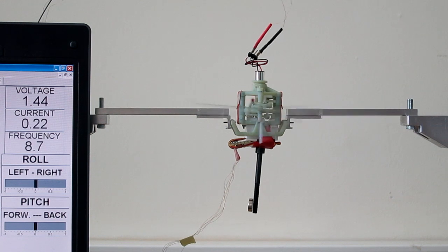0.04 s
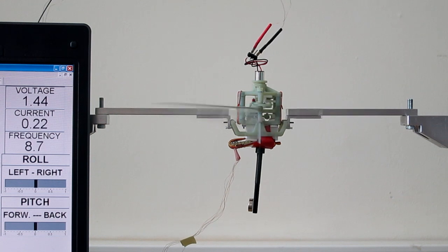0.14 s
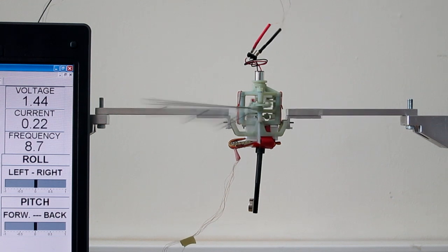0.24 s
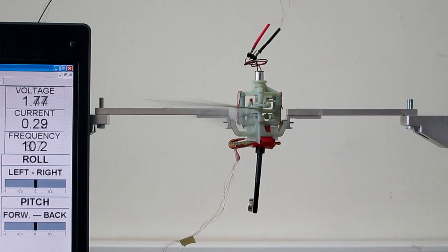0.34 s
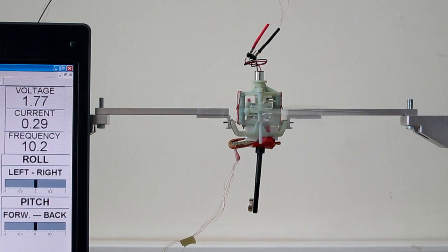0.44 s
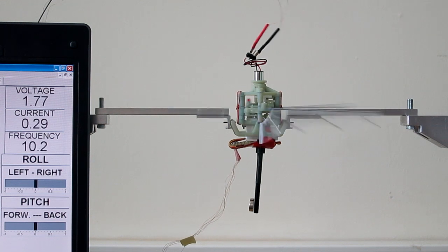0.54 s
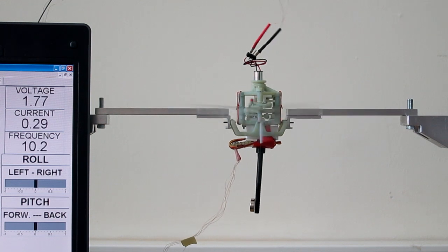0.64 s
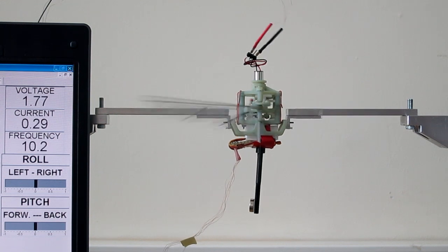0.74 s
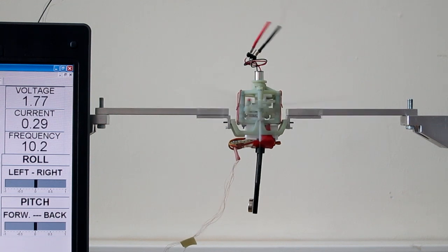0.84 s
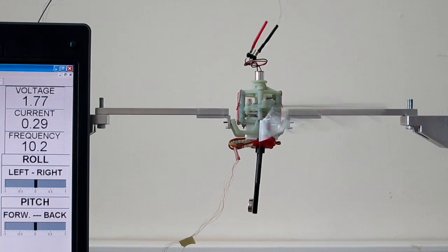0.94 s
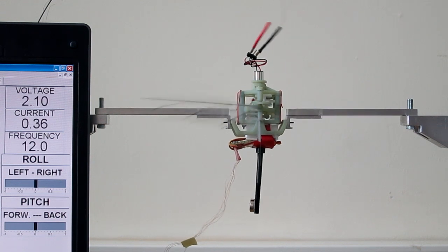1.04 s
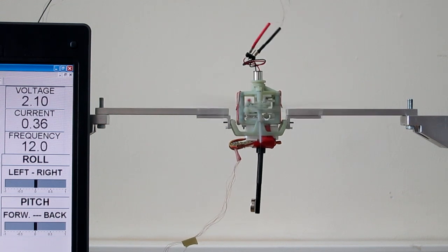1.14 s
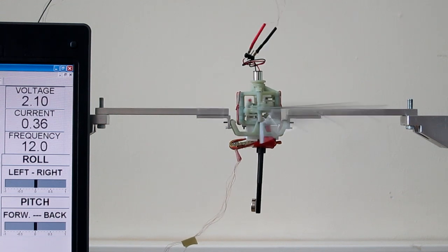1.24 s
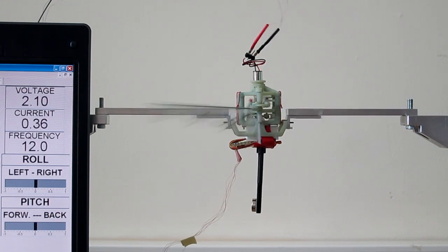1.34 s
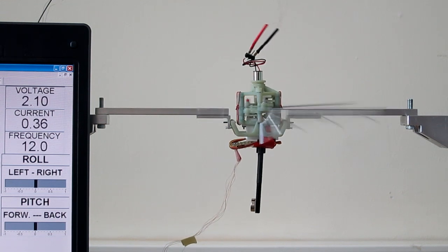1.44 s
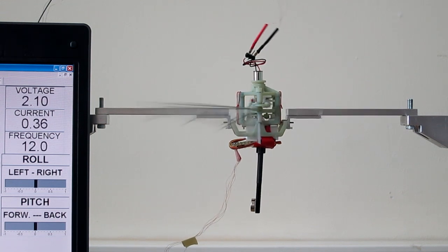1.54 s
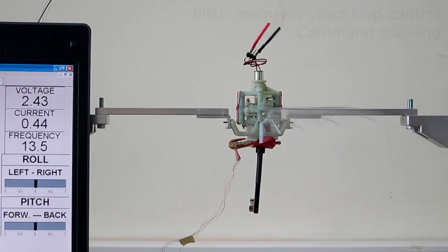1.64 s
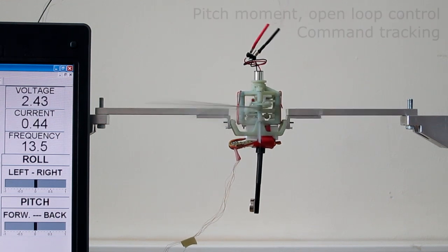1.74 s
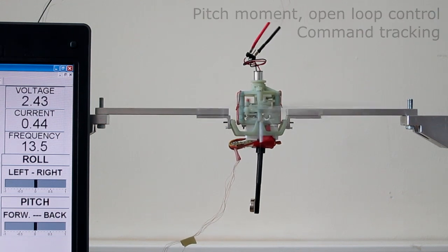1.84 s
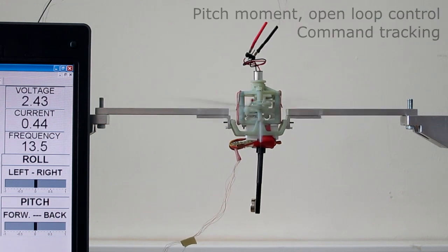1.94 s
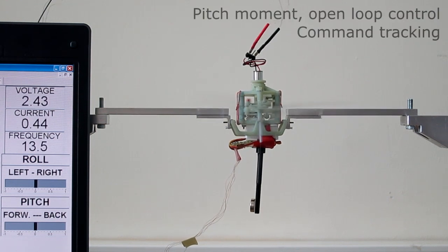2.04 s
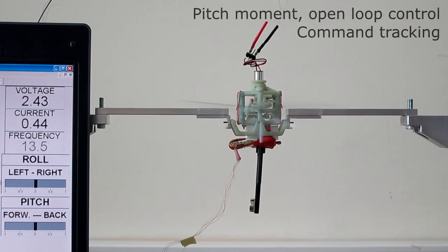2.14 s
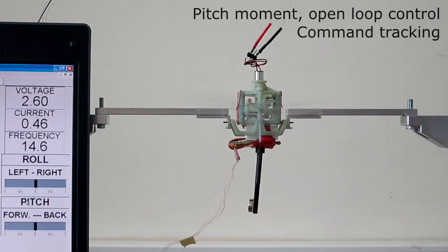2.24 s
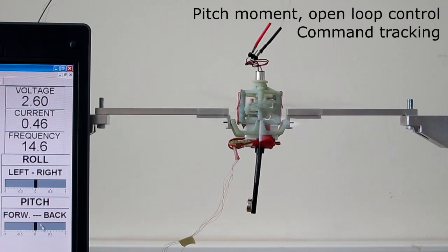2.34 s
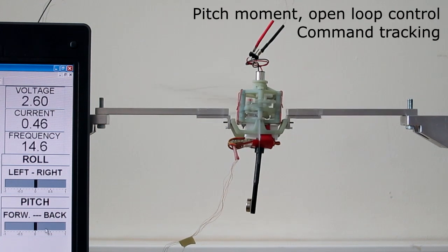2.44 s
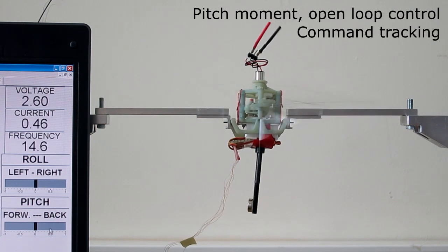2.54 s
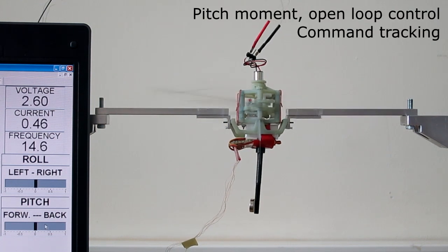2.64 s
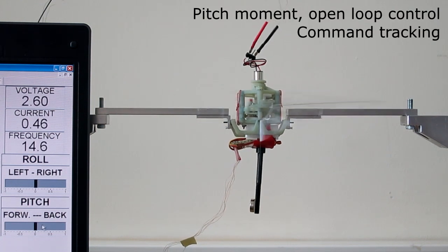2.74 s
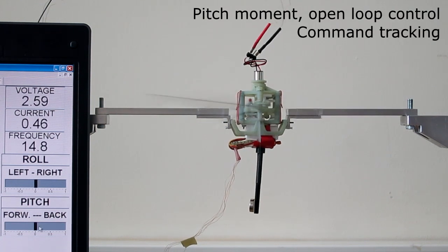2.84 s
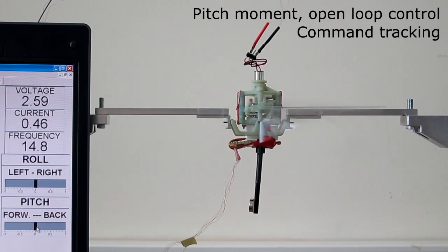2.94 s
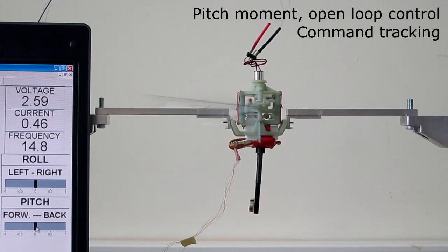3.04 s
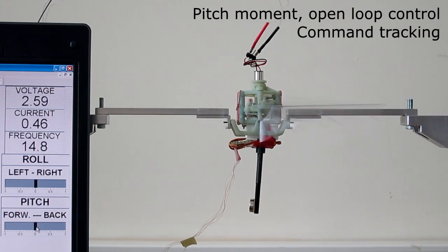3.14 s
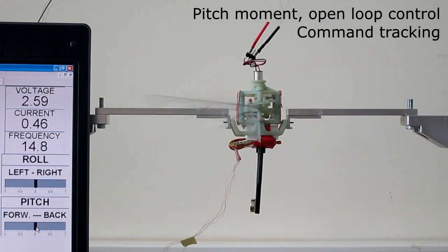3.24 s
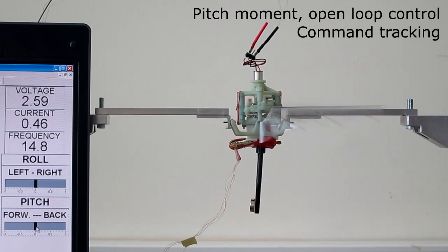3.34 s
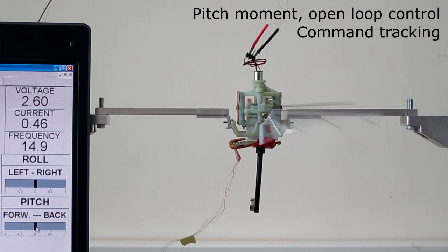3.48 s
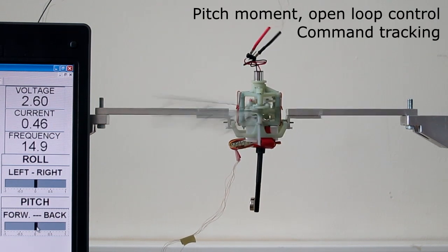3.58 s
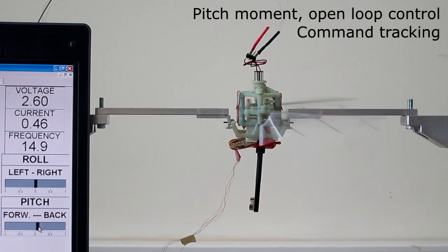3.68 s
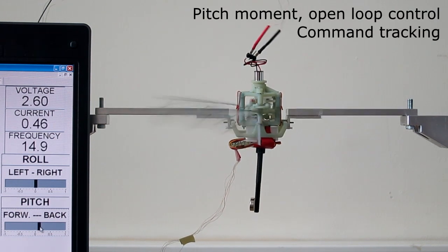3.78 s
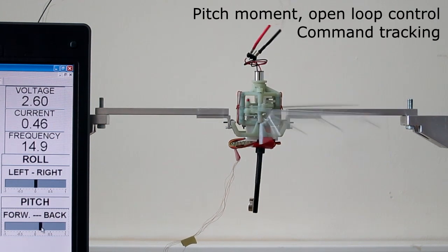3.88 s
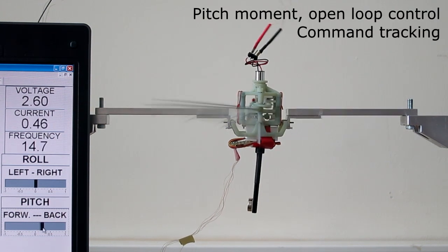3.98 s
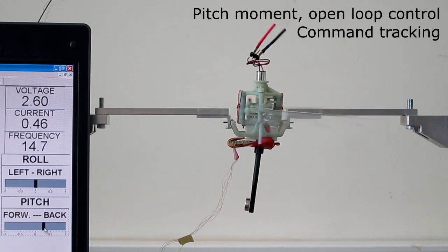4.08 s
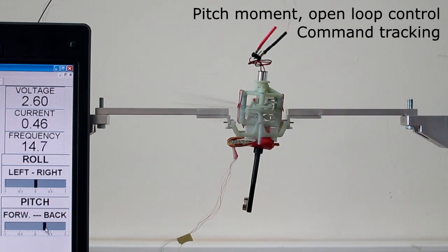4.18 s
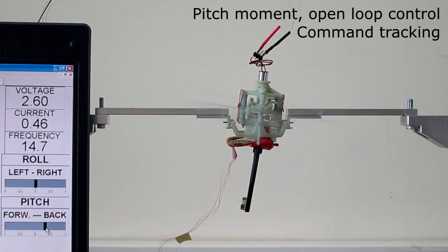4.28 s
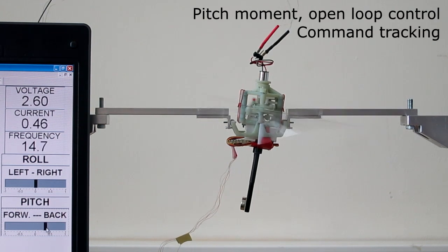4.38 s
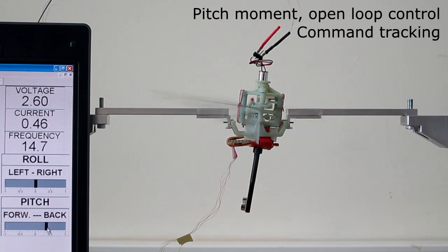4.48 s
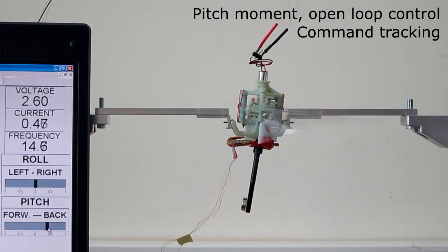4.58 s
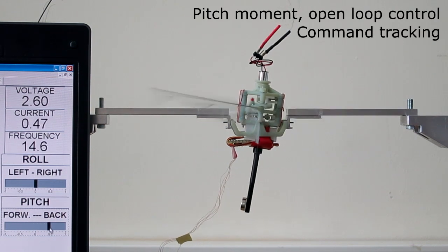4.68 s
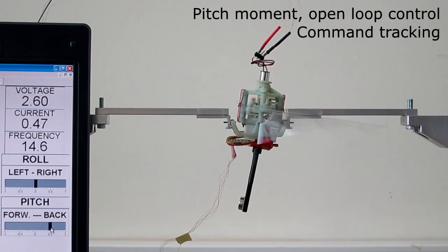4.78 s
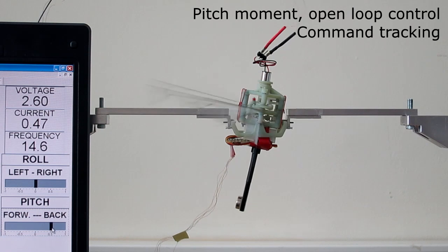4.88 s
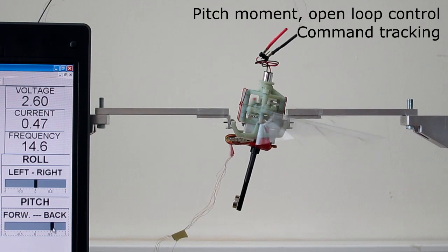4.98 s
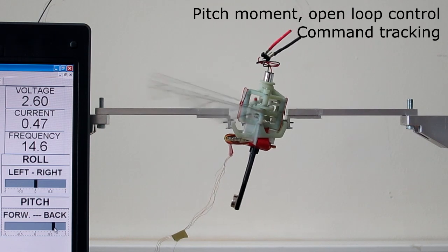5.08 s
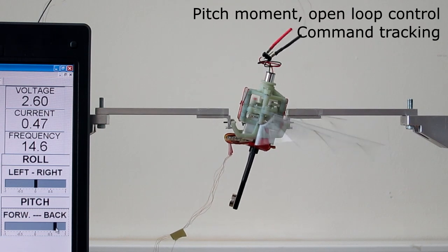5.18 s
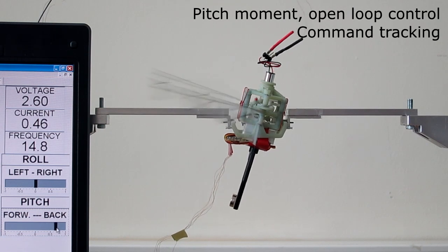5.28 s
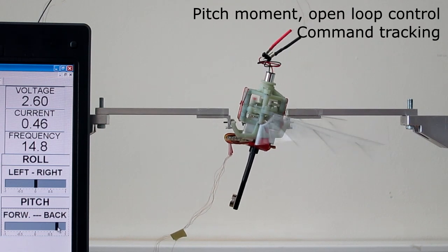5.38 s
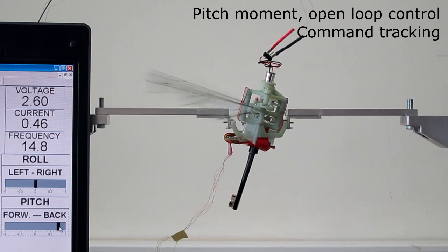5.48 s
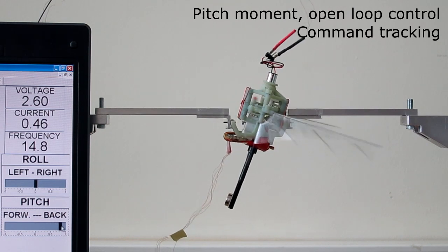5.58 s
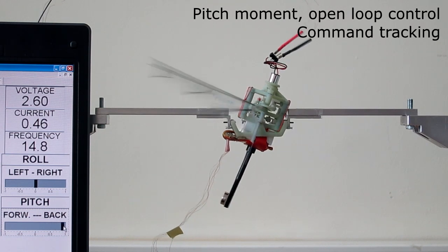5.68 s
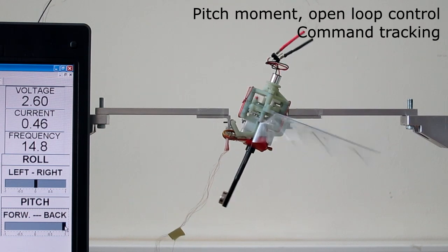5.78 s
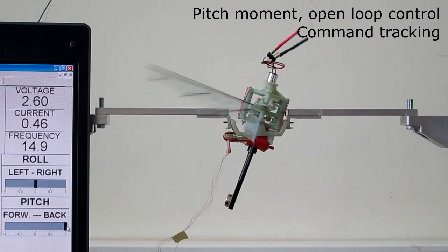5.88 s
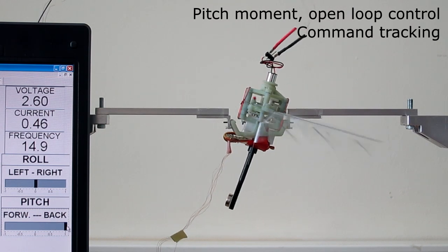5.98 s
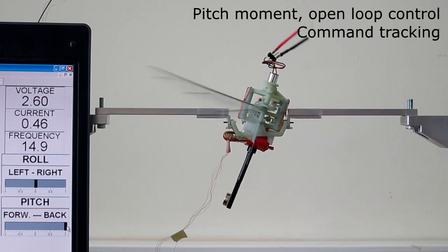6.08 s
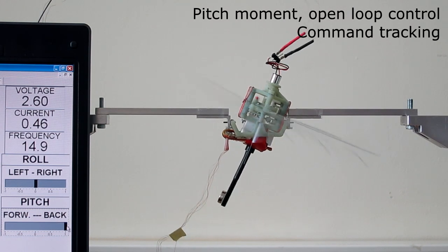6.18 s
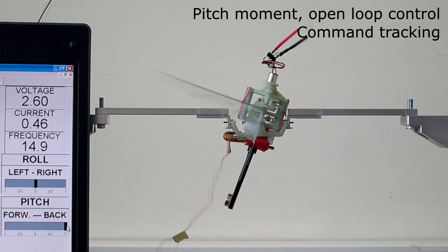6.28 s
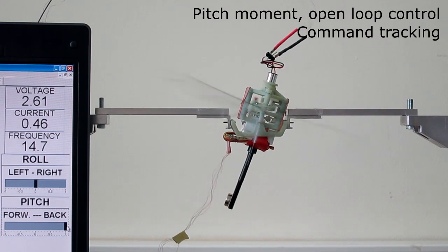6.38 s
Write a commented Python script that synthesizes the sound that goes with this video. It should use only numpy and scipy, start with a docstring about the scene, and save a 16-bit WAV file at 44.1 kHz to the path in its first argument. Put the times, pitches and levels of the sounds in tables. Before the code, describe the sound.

A stereo close microphone hears a tiny winged machine clattering on a test stand. Its paired snaps of thin film start as a quick rattle and tighten into a rough, fluttering buzz within three seconds. Low air pulses, hollow knocks and a throbbing hum lie beneath, with bright gear hiss between beats. The pace then stays nearly steady, wavering slightly, in a lightly reflective room with faint air noise.

```python
"""A lab, close up: a small flapping-wing robot speeds up on a test stand and settles near fifteen beats a second.
Twice in every wingbeat the film wings flip over: filtered pulses push the air, thump the membrane, knock
the frame and ring the stand, while bursts of tiny clicks make the crackling snap of the film.
Gears and sliding film hiss throughout, and the sweeping wings hum on multiples of the beat.
Sparse room reflections throw the ticks back over a low wash of air."""
import sys
import numpy as np
from scipy import signal
from scipy.fft import rfft, irfft
from scipy.io import wavfile
from scipy.ndimage import uniform_filter1d

SR = 44100
rng = np.random.default_rng(int(sys.argv[2]) if len(sys.argv) > 2 else 0)


def generate_wav(sig):
    """Save sig (samples, or channels by samples) to the path in sys.argv[1] as 16-bit PCM at SR."""
    pcm = np.round(np.clip(np.atleast_2d(sig).T, -1, 1) * 32767).astype(np.int16)
    wavfile.write(sys.argv[1], SR, pcm)


N = 283122
TIME = np.arange(N) / SR

# the motor is stepped up to cruising speed, then sags a little under load: start_s, wingbeats_per_s
WING_SPEED = [(0.0, 10.4), (0.54, 12.179), (0.84, 12.625), (1.52, 14.579), (2.62, 14.915), (2.72, 14.784),
              (3.04, 14.936), (3.72, 14.615), (4.3, 14.45), (4.4, 14.75), (4.88, 14.914), (5.82, 14.81),
              (5.96, 14.478), (6.42, 14.79)]
# how hard the wings work: start_s, effort_db, relative membrane thump_db
WING_LOAD = [(0.0, -5.5, -53), (0.36, -4.5, -51), (0.5, -7, -55.5), (1.02, -5, -57.5), (1.42, -2.5, -48.5),
             (1.8, -1.55, -47.5), (2.22, 1, -46.5), (2.38, -1.3, -51.5), (2.74, 0.3, -49), (3.14, 0.1, -49),
             (3.64, -1.5, -47), (4.0, -0.5, -45), (4.4, -1.5, -46), (5.1, -0.14, -46.5), (5.55, 1.6, -44),
             (5.76, 0.2, -43.5), (5.86, -1.8, -50.5), (6.42, -0.4, -46.5)]


def amp(db):
    """Decibels to gain."""
    return 10 ** (np.asarray(db) / 20)


def evened(x):
    """Scales to an rms of one."""
    return x / np.sqrt(np.mean(x ** 2) + 1e-20)


def curve(rows, t=TIME, column=1):
    """One column of a control curve at the times t, joined by straight lines."""
    rows = np.asarray(rows)
    return np.interp(t, rows[:, 0], rows[:, column])


def read(points, hz):
    """A spectrum at the frequencies hz, joined on a log axis."""
    point_hz, value = np.transpose(points)
    return np.interp(np.log(hz + 1), np.log(point_hz), value)


def through(x, response):
    """Convolves and keeps the length of the scene."""
    return signal.oaconvolve(x, response)[:N]


def colour(x, spectrum, size=4096):
    """Minimum-phase filter with the given spectrum: sharp attack, ringing afterwards."""
    hz = abs(np.fft.fftfreq(size, 1 / SR))
    log_gain = np.log(amp(read(spectrum, hz)))
    # the Hilbert transform of the log gain gives the phase
    response = np.fft.ifft(np.exp(np.conj(signal.hilbert(log_gain)))).real
    return through(x, response[:size // 2])


def shaped(x, spectrum):
    """Colours a sound and keeps its power."""
    return evened(colour(x, spectrum)) * x.std()


def swelled(x, spectrum):
    """Zero-phase filter: each push becomes a pressure pulse that builds as smoothly as it fades."""
    gain = amp(read(spectrum, np.fft.rfftfreq(2 * N, 1 / SR)))
    return irfft(rfft(x, 2 * N) * gain)[:N]


def ringing(modes):
    """The sum of dying tones after one blow."""
    t = np.arange(SR // 4) / SR
    return sum(amp(db - 60 * t / t60) * np.cos(2 * np.pi * hz * t) for hz, db, t60 in modes)


def add(mix, start_s, sound):
    """Mixes a sound in at start_s."""
    part = mix[max(round(start_s * SR), 0):][:len(sound)]
    part += sound[:len(part)]


def driven(law, t=TIME):
    """Level in dB of a part that grows with the effort of the wings."""
    full_db, growth = law
    return full_db + growth * curve(WING_LOAD, t)


def crank():
    """Turns of the crank so far, one for each wingbeat: the running sum of the speed."""
    start_turn = .1887
    return start_turn + np.cumsum(curve(WING_SPEED)) / SR


def flips():
    """Times of the taut and the slack wing flips, one of each in a turn of the crank."""
    slack_share = .478  # the slack flip comes just before half a wingbeat after the taut one
    turns = crank()
    beats = np.arange(int(turns[-1]))
    taut = np.interp(beats + 1, turns, TIME)
    slack = np.interp(beats + slack_share, turns, TIME)
    return taut, slack


def air(floor_db=-56):
    """Low wash of ventilation and stirred air: coloured noise, partly unlike at the two ports."""
    # hz, relative level_db
    floor_spectrum = [(20, 3), (45, 5), (70, -11), (130, -2), (350, 1), (700, -13), (2000, -10),
                      (8000, -73), (16000, -34)]
    left, right, shared = (evened(colour(rng.standard_normal(N), floor_spectrum)) for _ in range(3))
    return amp(floor_db) * evened(np.array([left, right]) + 0.26 * shared)


def wing_hum(hum_db=-9, port_spread=1.27, waver_db=3.5, speed_power=4.7):
    """The sweeping wings hum on multiples of the beat, louder with speed; each tone wavers."""
    # multiple of the wingbeat, relative level_db
    wing_tones = [(4, -8), (5, -13), (6, -7), (7, -1), (8, -10), (9, 1), (10, -1), (11, -4), (12, -5),
                  (13, -3), (14, -7)]
    out = np.zeros((2, N))
    angle = 2 * np.pi * crank()
    for multiple, db in wing_tones:
        # the high tones peak later in the stroke, so the hum throbs gently
        lag = np.pi * multiple ** 2 / 16
        # each tone meets the two ports out of step (radians)
        apart = port_spread * rng.choice([-1, 1]) * np.array([[.5], [-.5]])
        drift = rng.standard_normal(size=14)
        waver = np.interp(TIME, np.linspace(0, TIME[-1], len(drift)), drift)
        out += amp(db + waver_db * waver) * np.cos(multiple * angle - lag + apart)
    level_db = curve(WING_LOAD, column=2) + hum_db
    return amp(level_db) * evened(out * curve(WING_SPEED) ** speed_power)


def gears(grain_db=2.5, flutter_db=2.0):
    """Teeth and sliding film hiss: noise of uneven grains with a fast, irregular flutter."""
    # hz, relative level_db
    hiss_spectrum = [(100, -10), (400, -2), (700, -3), (1150, 1.5), (2000, -3.5), (3600, -4.5),
                     (4700, -1.5), (7000, 2.5), (10000, 2.5), (13000, 3.5), (15500, -7), (17000, -4.5)]
    # level_db at zero effort, dB gained per dB of effort
    hiss_law = (-37, 1.32)
    clicks, sizes, flutter = rng.standard_normal((3, N))
    flutter = evened(uniform_filter1d(flutter, size=160))
    grains = clicks * amp(grain_db * sizes + flutter_db * flutter)
    return amp(driven(hiss_law)) * evened(colour(grains, hiss_spectrum))


def blows(taut, slack, lead_s, slack_lead_s, slack_db, scatter_db, jitter_s):
    """One push at each flip, a little ahead of the snap; the return stroke pushes the other way."""
    times = np.r_[taut - lead_s, slack - slack_lead_s]
    force = np.r_[np.ones(len(taut)), -amp(slack_db) * np.ones(len(slack))]
    late, strong = rng.standard_normal((len(times), 2)).T
    places = np.round((times + jitter_s * late) * SR).astype(int)
    out = np.zeros(N)
    out[np.clip(places, 0, N - 1)] = force * amp(scatter_db * strong)
    return out


def body(taut, slack, chatter_s=0.011, chatter_db=-7):
    """Each flip shoves the air, thumps the membrane, knocks the frame and sets the stand ringing."""
    # spectra: hz, relative level_db
    push_spectrum = [(20, -45), (45, -32), (70, -18), (105, 5.5), (190, 5.5), (260, 4.5), (400, 1),
                     (900, -48)]
    thump_spectrum = [(30, -58), (100, -5), (240, -17), (320, -1), (400, 0), (500, 0), (620, -26),
                      (900, -24), (2500, -59)]
    knock_spectrum = [(300, -22), (780, -16.5), (950, -5), (1080, 4), (1190, -2), (1340, 0), (1600, -6.5),
                      (2000, -7.5), (2350, -17), (2850, -20.5), (3600, -25), (6000, -17), (15000, -20.5)]
    # what the stand rings with: pitch_hz, relative level_db, t60_s
    stand_modes = [(203, -4, .11), (339, -4, .055), (373, -4, .07), (442, -4, .09), (469, -4, .056)]
    # frame knock before its final trim: level_db at zero effort, dB gained per dB of effort
    knock_law = (-42.5, 1.08)
    # the robot leans over on its stand, which loads the slack stroke: start_s, lean_degrees
    lean_curve = [(0, 0), (4.2, 0), (5.6, 20), (6.42, 20)]
    thump_db_per_degree, knock_db_per_degree = -0.07, 0.2
    lean = curve(lean_curve, slack)

    drive = blows(taut, slack, lead_s=0.00043, slack_lead_s=0.0021,
                  slack_db=0.5 + thump_db_per_degree * lean, scatter_db=1.26, jitter_s=0.00035)
    thump_db = curve(WING_LOAD, column=2)
    push = amp(thump_db - 12.0) * evened(swelled(drive, push_spectrum))
    thump = amp(thump_db - 5.0) * evened(swelled(drive, thump_spectrum))
    stand = amp(thump_db - 15.5) * evened(through(drive, ringing(stand_modes)))

    strikes = blows(taut, slack, lead_s=0.001288, slack_lead_s=0.001853,
                    slack_db=-0.7 + knock_db_per_degree * lean, scatter_db=1.3, jitter_s=.0003)
    # play in the linkage lets the frame chatter as the load reverses, before and after each strike
    reversal = np.exp(-abs(np.arange(-SR // 20, SR // 20) / SR) / chatter_s)
    chatter = rng.standard_normal(N) * signal.oaconvolve(strikes, reversal, "same")
    rattle = evened(strikes) + amp(chatter_db) * evened(chatter)
    knock = amp(driven(knock_law) - 2.0) * evened(colour(rattle, knock_spectrum))
    return -(push + thump + knock + stand)


def snap_levels(taut, slack, scatter_db=0.55):
    """Both snaps follow the effort, each a little different; a limp flip is weaker."""
    # snap laws before the film mix: level_db at zero effort, dB gained per dB of effort
    taut_law = (-16.5, 0.66)
    slack_law = (-20.5, 1)
    # now and then the film stays limp and the nearest taut flip is weak: start_s, change_db
    limp_flips = [(2.048, -2), (3.599, -1.5), (3.668, -3.5), (4.356, -3), (5.837, -3.5), (5.974, -2),
                  (6.112, -3)]
    taut_db, slack_db = scatter_db * rng.standard_normal((len(taut), 2)).T
    for s, change_db in limp_flips:
        taut_db[np.argmin(abs(taut - s))] += change_db
    return taut_db + driven(taut_law, taut), slack_db + driven(slack_law, slack)


def snaps(times, levels_db, snap_s, rustle_db, flutter_db, rise_s, fall_s, crease_db):
    """The film rustles as it turns over, snaps tight in a burst of tiny clicks, and flutters out."""
    t = np.arange(-SR // 80, SR // 50) / SR
    snap = np.exp(-(t / snap_s) ** 4)
    rustle = amp(rustle_db) * np.exp(-abs(t) / rise_s)
    flutter = amp(flutter_db) * np.exp(-abs(t) / fall_s)
    shape = snap + np.where(t < 0, rustle, flutter)
    out = np.zeros(N)
    for s, db in zip(times, levels_db):
        clicks = rng.choice([-1, 1], len(t))
        spectrum = rfft(shape * clicks)
        # the film creases differently each time, so every snap has its own colour
        crease = signal.resample(rng.standard_normal(size=18), len(spectrum))
        spectrum *= amp(crease_db * crease)
        add(out, s + t[0], amp(db) * evened(irfft(spectrum, len(t))))
    return out


def film(taut, slack, reflection_db=-11):
    """All snaps and whip cracks, film-coloured, with a short bright ring coloured by a close reflection."""
    # hz, relative level_db
    film_spectrum = [(200, -30.5), (1200, -16), (2200, -21.5), (2900, -13.5), (3700, -22.5), (4500, -5),
                     (6000, -4.5), (7500, -1.5), (9500, 2), (11500, 2), (13500, 0), (15500, -7), (17000, 0)]
    # evenly spaced peaks of a close reflection: pitch_hz, relative level_db, t60_s
    reflection_peaks = [(3140, -1, 0.0034), (4626, 5.5, 0.0064), (6175, 4.5, 0.011), (7560, 5, 0.011),
                        (8970, 4.5, 0.017), (10270, 3, 0.023)]
    # the film now and then cracks like a whip: start_s, relative level_db
    whip_cracks = [(0.0761, -22), (.2595, -23), (0.4333, -20), (0.7609, -18), (0.8393, -18.5),
                   (2.3182, -19), (2.521, -15.5), (2.993, -26), (4.0802, -21), (5.7684, -15.5),
                   (5.9047, -26)]
    taut_shape = dict(snap_s=.0012, rustle_db=-.5, flutter_db=0, rise_s=.004, fall_s=.0044, crease_db=.7)
    slack_shape = dict(snap_s=.001, rustle_db=2, flutter_db=3, rise_s=.004, fall_s=.005, crease_db=.7)
    crack_shape = dict(snap_s=.0007, rustle_db=-22, flutter_db=-20, rise_s=.001, fall_s=.0018, crease_db=1.5)
    taut_db, slack_db = snap_levels(taut, slack)
    out = amp(-9.5) * snaps(taut, taut_db, **taut_shape)
    out += amp(-9.5) * snaps(slack, slack_db, **slack_shape)
    out += amp(-12.5) * snaps(*np.transpose(whip_cracks), **crack_shape)
    reflection_ring = amp(reflection_db) * out.std() * evened(through(out, ringing(reflection_peaks)))
    return shaped(out, film_spectrum) + reflection_ring


def film_spread(taut, slack):
    """The moving film reaches the two ports from many directions: fresh snaps and hiss for the side."""
    # hz, side_minus_mid_db
    film_width = [(100, -1), (1200, -7), (3000, -37), (6000, -23.5), (9000, -7), (14000, -7)]
    return colour(amp(-6.0) * film(taut, slack) + amp(-.1) * gears(), film_width)


def room_tail():
    """Sparse reflections of random sign, each band dying at its own speed."""
    # hz, t60_s
    room_decay = [(100, 0.14), (1000, 0.64), (5000, 0.16), (16000, 0.43)]
    taps = rng.standard_normal(SR // 2) * (rng.random(SR // 2) < 1 / 8)
    taps[:SR // 200] = 0  # 5 ms before the first reflection
    hz, t, bands = signal.stft(taps, SR, nperseg=256)
    decay = amp(-60 * t / read(room_decay, hz)[:, None])
    tail = signal.istft(bands * decay, SR, nperseg=256)[1]
    return tail / np.linalg.norm(tail)


def lab(x, spread):
    """The walls answer; their late sound and the spread of the film differ between the ports."""
    # hz, reflection level_db
    wet_spectrum = [(100, -5), (400, -5), (1200, -10.5), (3000, -7), (8000, -14.5), (16000, -12)]
    # hz, relative side_minus_mid_db
    room_width = [(60, 2), (160, 8), (350, -2), (700, -0.5), (1400, -1), (2800, -15.5), (5500, -42),
                  (9000, -7), (14000, 0)]
    wet = colour(x, wet_spectrum)
    mid = x + through(wet, room_tail())
    side = amp(0.2) * colour(through(wet, room_tail()), room_width) + spread
    return np.array([mid + side, mid - side])


def scene():
    """The robot in the lab."""
    taut, slack = flips()
    robot = gears() + body(taut, slack) + film(taut, slack)
    return air() + wing_hum() + lab(robot, film_spread(taut, slack))


def record(dry):
    """The two ports differ slightly in colour and lose the deep bass; then the band limit."""
    # hz, left_minus_right_db
    port_tilt = [(100, -1.5), (400, -1), (1200, -1.5), (2400, 1), (4400, -4.7), (8000, 0.9), (15000, 0.8)]
    low_cut_hz, edge_hz = 62, 15850
    hz = np.fft.rfftfreq(N, 1 / SR)
    tilt_db = read(port_tilt, hz)
    low_cut = hz ** 2 / np.hypot(hz ** 2, low_cut_hz ** 2)
    port_gain = amp(np.array([tilt_db, -tilt_db]) / 2)
    ports = irfft(rfft(dry) * low_cut * port_gain, N)
    low_pass = signal.firwin(601, edge_hz, window=("kaiser", 8), fs=SR)
    return signal.oaconvolve(ports, low_pass[None], "same")


dry = scene()
out = record(dry)
generate_wav(out)
```